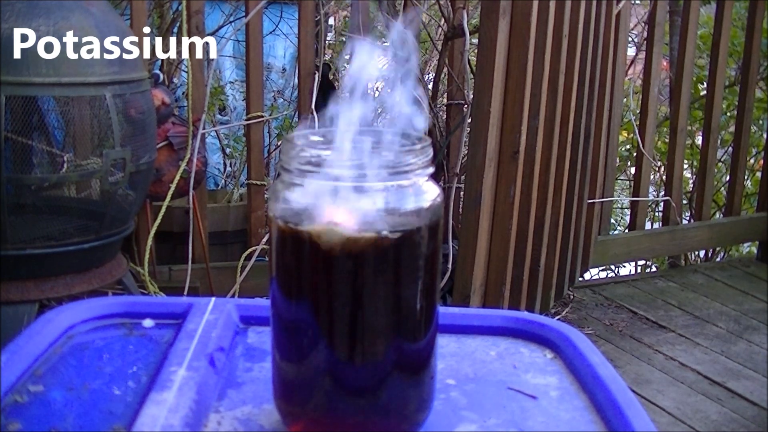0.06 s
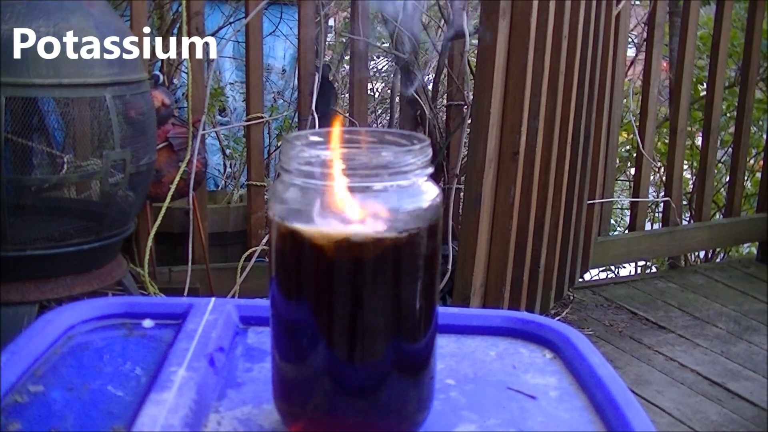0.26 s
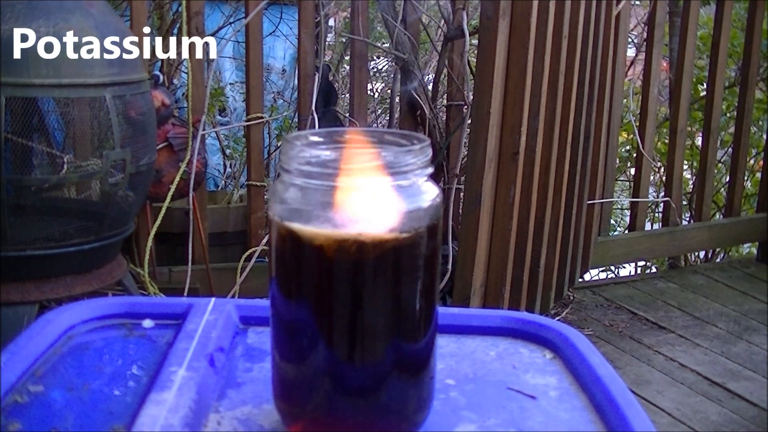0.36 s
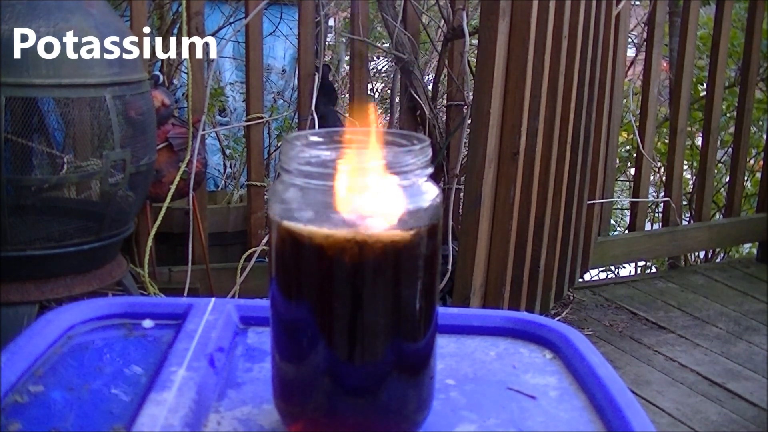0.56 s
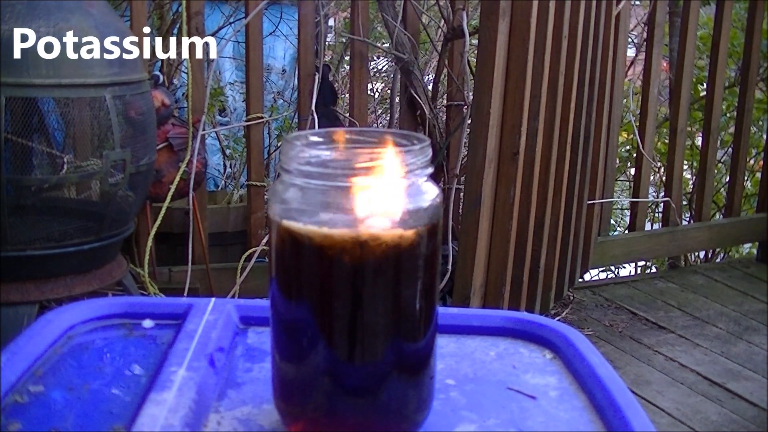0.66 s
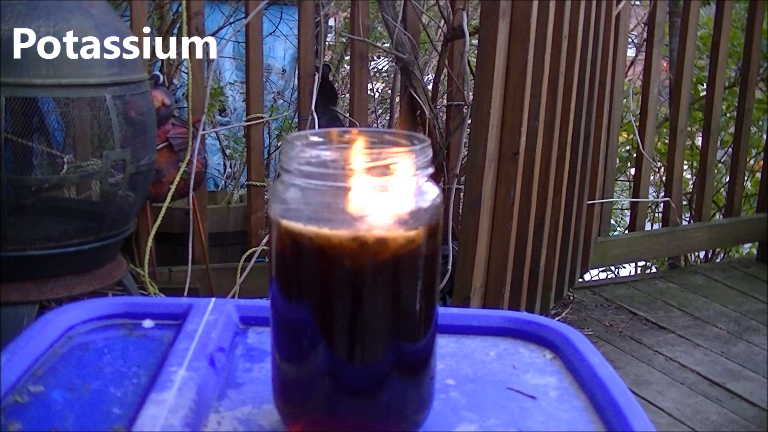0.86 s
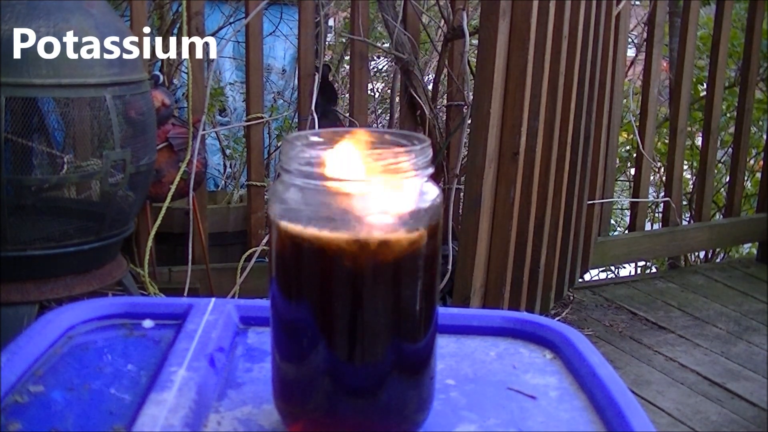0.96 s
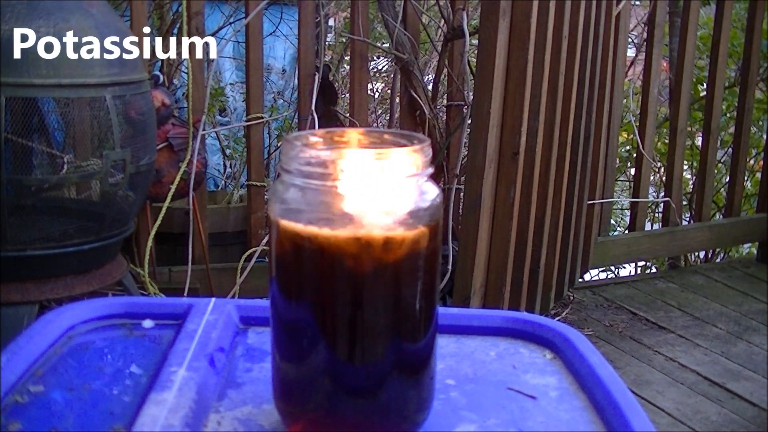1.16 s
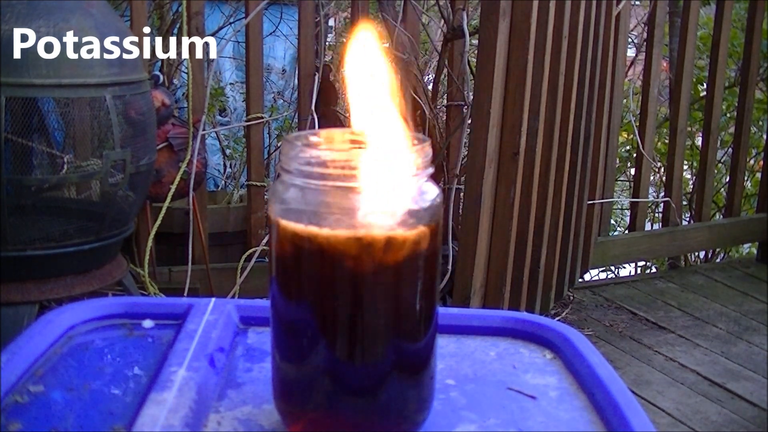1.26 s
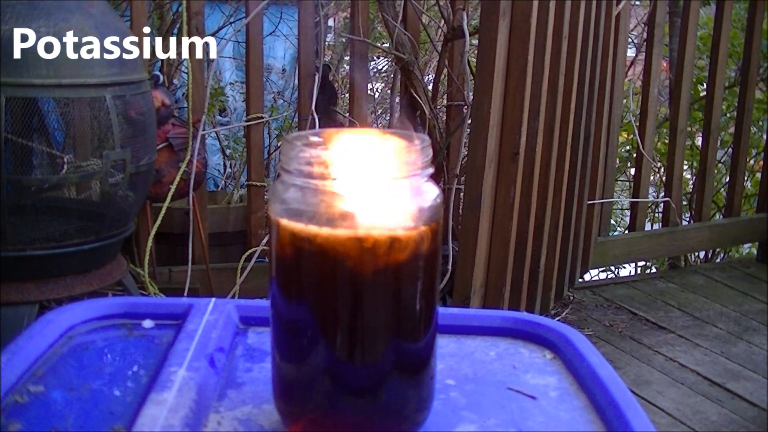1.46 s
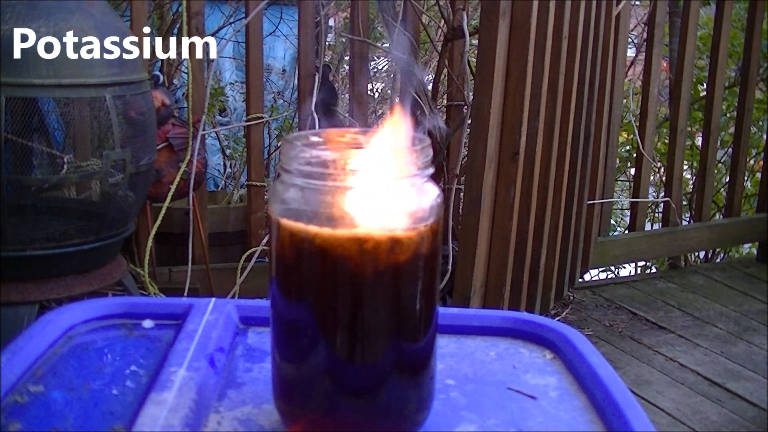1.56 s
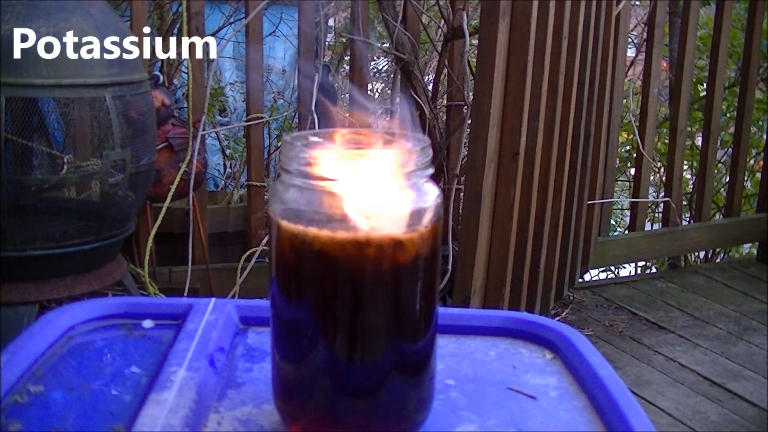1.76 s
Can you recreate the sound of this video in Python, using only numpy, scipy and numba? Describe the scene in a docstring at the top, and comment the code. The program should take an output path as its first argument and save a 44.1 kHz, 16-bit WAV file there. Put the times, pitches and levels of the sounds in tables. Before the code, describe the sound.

Metal fizzing and burning on liquid in a jar, with one sharp pop and crackles.

```python
"""Potassium burning in a jar

A lump of potassium skates on the liquid in an open glass jar on a wooden deck. Its hydrogen ignites
with one sharp pop that the fence throws back. It burns with a soft roar, fizzing, spitting and snapping.
The fizz rings the air in the jar, whose resonances (favourite pitches) glide as the lump moves about."""
import sys
import numpy as np
from scipy import signal
from scipy.fft import rfft, irfft
from scipy.io import wavfile
from numba import njit

SR = 44100
rng = np.random.default_rng(int(sys.argv[2]) if len(sys.argv) > 2 else 0)


def output_pcm(signal):
    """Save a mono or channel-first signal as 16-bit PCM at the path in sys.argv[1].

    Samples are clipped to [-1, 1] before scaling.
    """
    pcm = np.clip(np.atleast_2d(signal).T, -1, 1) * 32767
    wavfile.write(sys.argv[1], SR, np.round(pcm).astype(np.int16))


N = 79380

# tone of the sound scattered to the sides (frequency [Hz], level [dB])
SIDE_COLOUR = [(30, 31), (100, 9.5), (600, 21.5), (1300, 19), (2600, -54.5), (4500, -49), (8500, 26),
               (12000, 18.5), (15800, -22)]
# tone of the flame's roar (frequency [Hz], level [dB])
ROAR_COLOUR = [(20, 6), (40, -2.5), (65, -8), (90, -4.5), (130, -3), (210, 0.5), (310, -4.5), (450, -5),
               (700, -7), (950, -6.5), (1300, -10.5), (1700, -8), (2200, -9.5), (2600, -17), (3300, -28),
               (6000, -63)]
# loudness of the roar (time [s], level [dB])
ROAR_LEVEL = [(0, -36.5), (.13, -35.5), (.3, -35.5), (.45, -36), (.65, -35), (.77, -35.5), (.95, -36.5),
              (1.2, -36), (1.45, -35), (1.66, -34.5), (1.8, -37.5)]
# spits of molten metal (time [s], decay [s], splutter [dB], neck [dB], first resonance [dB], fizz [dB])
SPITS = [(0.119, 0.013, -35, -46, -52, -50), (0.23, 0.0017, -46, -31.5, -28, -53),
         (0.285, 0.0037, -40, -32, -32, -38), (0.311, 0.0072, -44, -32, -40, -33),
         (.358, 0.011, -42, -40, -32, -54), (0.389, 0.0021, -30, -31, -31, -42),
         (0.466, 0.0087, -33.5, -42, -37, -48), (0.741, 0.0029, -35, -33, -30.5, -51),
         (0.751, 0.0057, -33, -53, -53, -62), (0.831, 0.022, -41, -59, -52, -48),
         (1.072, 0.028, -46, -33, -36.5, -38), (1.334, 0.022, -46, -32, -38, -44.5),
         (1.553, 0.005, -32, -35, -42, -53), (1.634, .013, -28.5, -36, -48, -47),
         (1.73, .006, -34.5, -30.5, -54, -41), (1.747, 0.01, -33, -45, -33, -42)]
# tone of a spit's low splutter (frequency [Hz], level [dB])
SPLUTTER_COLOUR = [(40, -20), (150, -4), (400, -3), (700, 0), (1100, 1), (1600, -2), (2500, -15),
                   (6000, -30)]
# loudness of the broad fizz (time [s], level [dB])
FIZZ_LEVEL = [(0, -46), (.15, -40.5), (.22, -43), (.27, -45.5), (.42, -43.5), (.7, -47), (.9, -51.5),
              (1.03, -51.5), (1.1, -49), (1.28, -46.5), (1.38, -42.5), (1.57, -47), (1.66, -40.5),
              (1.74, -48.5), (1.8, -45)]
# tone of the broad fizz (frequency [Hz], level [dB])
FIZZ_COLOUR = [(1000, -15), (2400, -9.5), (3200, 8.5), (3700, 6), (5200, 8), (5700, -11), (6800, 1),
               (7700, 1), (9500, 2), (11000, 1), (12200, -10), (13500, -5), (15800, -11.5)]
# hollow note of the jar's neck (time [s], frequency [Hz], level [dB])
NECK_NOTE = [(0, 1900, -82), (.38, 2050, -46), (.6, 1850, -48), (1.0, 2000, -50), (1.1, 2090, -45),
             (1.22, 2040, -43), (1.4, 2134, -40), (1.6, 2110, -38.5), (1.8, 2110, -45.5)]
# gliding resonances of the air in the jar (time [s], first [Hz], second [Hz], third [Hz], fourth [Hz])
JAR_PITCHES = [(0, 3860, 5900, 7900, 11400), (.155, 3880, 5900, 7900, 10200),
               (.21, 4750, 6100, 7950, 10700), (.28, 4600, 6000, 7150, 11000),
               (.36, 4390, 6380, 8550, 10600), (.4, 4270, 6360, 8600, 10650),
               (.68, 4260, 6370, 8750, 10850), (.78, 4200, 6300, 8400, 10600),
               (.85, 4170, 6020, 8250, 11100), (.95, 4190, 6020, 8300, 11200),
               (1.07, 4620, 6900, 8700, 11800), (1.17, 4370, 6900, 8400, 11500),
               (1.3, 4720, 6900, 8950, 11400), (1.41, 4770, 6600, 8950, 10600),
               (1.55, 5130, 7300, 9250, 11150), (1.8, 5200, 7470, 9000, 11350)]
# loudness of the first resonance (time [s], level [dB])
FIRST_LEVEL = [(0, -45.5), (.09, -44.5), (.17, -42.5), (.22, -45), (.33, -49), (.37, -38), (.43, -40.5),
               (.72, -42.5), (.95, -47), (1.08, -43.5), (1.2, -44), (1.4, -44), (1.6, -43.5), (1.72, -41),
               (1.8, -44)]
# loudness of the three upper resonances (time [s], second [dB], third [dB], fourth [dB])
UPPER_LEVELS = [(0, -55.5, -62, -55.5), (.16, -52, -53, -62), (.22, -69, -46.5, -37.5),
                (.275, -63, -51, -81), (.31, -55, -61, -59), (.4, -51, -50, -55), (.68, -52, -49.5, -54.5),
                (.85, -58, -54, -55.5), (1.02, -63, -52, -55), (1.17, -64, -53, -50.5),
                (1.42, -55, -51.5, -68), (1.62, -73, -68, -53), (1.69, -54, -52, -56),
                (1.75, -40.5, -46, -59), (1.8, -53, -61, -55)]
# thin, high sizzle, strongest once the flame is tall (time [s], frequency [Hz], level [dB])
SIZZLE = [(0, 13000, -55), (.23, 13000, -58), (.29, 12500, -63), (.5, 12600, -57), (.75, 13000, -63),
          (1.0, 14000, -60), (1.15, 14000, -56), (1.27, 13400, -55), (1.38, 11800, -46.5),
          (1.5, 13000, -53), (1.62, 13400, -65), (1.73, 13500, -48), (1.8, 13600, -61)]
# narrow, steady jar notes that ring up as the fizz glides past them (frequency [Hz], gain [dB])
STEADY_NOTES = [(3170, 1), (3840, -25), (4290, -10), (4805, -5), (4985, -11.5), (5985, 6), (6353, -10),
                (7416, -7), (7795, 3), (8378, -5), (8900, -1), (9980, 3), (10450, -5)]
# single bubbles that burst with a snap (time [s], level [dB])
SNAPS = [(0.792, -33), (1.073, -26), (1.3423, -15), (1.347, -22), (1.6355, -22.5)]
# tone of a snap's sharp edge (frequency [Hz], level [dB])
SNAP_COLOUR = [(200, -7), (1000, -9), (2200, 4), (5000, -5), (8000, -8), (15000, -8)]
# notes of the jar's air, driven by the explosion (frequency [Hz], level [dB])
POP_NOTES = [(690, -14), (1260, -5), (1620, -13), (1920, -5), (2240, -15), (3200, -22.5), (3910, -20),
             (4400, -22), (4990, -22)]
# the fence's echo (time after the pop [s], level [dB])
ECHO_LEVEL = [(.003, -23), (.011, -23), (.014, -33), (.02, -26), (.027, -23), (.036, -27), (.045, -39),
              (.08, -58), (.2, -90)]
# tone of the echo (frequency [Hz], level [dB])
ECHO_COLOUR = [(100, -32), (900, -29), (1350, -8), (1800, 1), (2050, -13), (2500, -30.5), (4500, -33),
               (9000, -42)]

BURSTS_PER_S, BURST_SPREAD_DB, BURST_POWER_SHARE = 2500, 2.5, 0.51
ROAR_FLICKER_DB, FIZZ_FLICKER_DB = 1.17, 1.02
SPIT_RISE_S = 0.00095
NOTCH_RATIO, NOTCH_DEPTH = 0.786, 0.58
UPPER_WIDTHS_HZ = (270, 450, 520)
SNAP_DECAY_S, SNAP_EDGE_S, SNAP_FIRST_DB, SNAP_EDGE_DB = 0.00064, 0.00035, -9, -6
POP_START_S, POP_ATTACK_S, POP_HOLD_S, POP_RELEASE_S = .166, .0007, .0038, .0003
PUSH_AFTER_S, PUSH_WIDTH_S = .0022, .0005
CRACK_DB, THUMP_DB = -18, -6
SIDE_DB, BALANCE_DB = -24.5, 0.04
LOW_CUT_HZ, TOP_HZ, CEILING = 60, 15800, 1.27


def undb(db):
    """Turn decibels into a number to multiply by."""
    return 10 ** (np.asarray(db) / 20)


def unit(x):
    """Scale a signal to an average power of 1."""
    return x / np.sqrt(np.mean(x ** 2))


def curve(table, column=1, start=0):
    """Join the points in one column of a time table, giving a value for every sample."""
    rows = np.array(table, float)
    return np.interp(np.arange(N) / SR - start, rows[:, 0], rows[:, column])


def colour(x, points):
    """Shape the tone by (frequency [Hz], level [dB]) points; white noise keeps its power."""
    hz, db = np.array(points, float).T
    gain = undb(np.interp(np.log(np.fft.rfftfreq(N, 1 / SR) + 1), np.log(hz), db))
    return irfft(rfft(x) * unit(gain), N)


@njit
def gliding_band(x, hz, width_hz):
    """Let through the sound near a pitch that is given for every sample."""
    out, band, low = np.empty(len(x)), 0., 0.
    for i in range(len(x)):
        tuning = np.tan(np.pi * hz[i] / SR)
        damping = np.pi * width_hz / SR * (1 + tuning * tuning) / tuning
        swing = (band + tuning * (x[i] - low)) / (1 + tuning * (tuning + damping))
        band = 2 * swing - band
        low += 2 * tuning * swing
        out[i] = damping * swing
    return out


def band_pass(x, hz, width_hz):
    """Let through the sound near a steady or moving pitch."""
    return gliding_band(x, hz * np.ones(N), float(width_hz))


def resonate(x, hz, width_hz):
    """Ringing air: two band filters in a row, scaled so white noise keeps about the same power."""
    once = band_pass(x, hz, width_hz)
    return band_pass(once, hz, width_hz) * np.sqrt(2 * SR / (np.pi * width_hz))


def wander(per_s):
    """Drift at random, mostly between -1 and 1."""
    steps = rng.standard_normal(1024)
    return 1.1 * np.interp(np.arange(N) / SR * per_s, np.arange(len(steps)), steps)


def deck_scatter(jar):
    """The deck scatters a brief trace of the jar's sound to the sides."""
    age = np.arange(SR // 10) / SR
    tail = rng.standard_normal(len(age)) * np.exp(-age / 0.0091)
    scattered = signal.fftconvolve(jar, tail / np.linalg.norm(tail))[:N]
    return undb(SIDE_DB) * colour(scattered, SIDE_COLOUR)


def bubbles():
    """Countless tiny bursts of gas over a smooth jet of steam."""
    steam = rng.standard_normal(N)
    sizes = undb(BURST_SPREAD_DB * np.minimum(rng.exponential(size=N), 5))
    signs = rng.choice([-1, 1], N)
    bursts = unit(sizes * signs * (rng.random(N) < BURSTS_PER_S / SR))
    return np.sqrt(BURST_POWER_SHARE) * bursts + np.sqrt(1 - BURST_POWER_SHARE) * steam


def spitting(column):
    """Spits are puffs of gas that start fast and die away, at the levels in one column of SPITS."""
    t, power = np.arange(N) / SR, np.zeros(N)
    for spit in SPITS:
        start, decay_s = spit[:2]
        age = np.maximum(t - start, 0)
        rise = np.minimum(age / SPIT_RISE_S, 1)
        fall = np.exp(-np.maximum(age - SPIT_RISE_S, 0) / decay_s)
        power += (undb(spit[column]) * rise * fall) ** 2
    return np.sqrt(power) * rng.choice([-1, 1], N)


def flame():
    """The soft, fluttering roar of burning gas and the splutter of the liquid."""
    roar = bubbles() * undb(curve(ROAR_LEVEL) + ROAR_FLICKER_DB * wander(per_s=44.2))
    return colour(roar, ROAR_COLOUR) + colour(spitting(column=2), SPLUTTER_COLOUR)


def fizz():
    """Boiling round the metal, heard directly and through the jar's gliding and steady resonances."""
    flicker = undb(FIZZ_FLICKER_DB * wander(per_s=57))

    def gas(db):
        """Fresh bubbling that shares the one flicker."""
        return bubbles() * flicker * undb(db)

    first_hz, neck_hz = curve(JAR_PITCHES), curve(NECK_NOTE)
    out = colour(gas(curve(FIZZ_LEVEL)) + spitting(column=5), FIZZ_COLOUR)
    # sound bouncing off the wall partly cancels the fizz a little below the first resonance
    out -= NOTCH_DEPTH * band_pass(out, NOTCH_RATIO * first_hz, width_hz=1300)
    out += resonate(gas(curve(NECK_NOTE, column=2)) + spitting(column=3), neck_hz, width_hz=420)
    out += resonate(gas(curve(FIRST_LEVEL)) + spitting(column=4), first_hz, width_hz=400)
    # a softer, wider hiss follows the first resonance
    out += resonate(gas(curve(FIRST_LEVEL) - 8), 1.04 * first_hz, width_hz=900)
    out += resonate(gas(db=-55.5), hz=4920, width_hz=1100)  # a faint hiss that keeps its pitch
    for column, width_hz in enumerate(UPPER_WIDTHS_HZ, start=1):
        out += resonate(gas(curve(UPPER_LEVELS, column)), curve(JAR_PITCHES, column + 1), width_hz)
    out += resonate(gas(curve(SIZZLE, column=2)), curve(SIZZLE), width_hz=2900)
    return out + sum(undb(db) * band_pass(out, hz, width_hz=30) for hz, db in STEADY_NOTES)


def snaps():
    """Each bursting bubble gives a short crack that rings the neck and the first resonance."""
    t, out = np.arange(N) / SR, np.zeros(N)
    first_hz, neck_hz = curve(JAR_PITCHES), curve(NECK_NOTE)
    edge = colour(rng.choice([-1, 1], N), SNAP_COLOUR)
    for start, db in SNAPS:
        age = np.maximum(t - start, 0)
        ring = np.sin(2 * np.pi * neck_hz * age)
        ring += undb(SNAP_FIRST_DB) * np.sin(2 * np.pi * first_hz * age)
        crack = undb(SNAP_EDGE_DB) * edge * (age > 0) * np.exp(-age / SNAP_EDGE_S)
        out += undb(db) * (ring * np.exp(-age / SNAP_DECAY_S) + crack)
    return out


def fence_echo(age):
    """The fence throws the pop back as a short wash of noise; age is seconds since the pop."""
    loudness = (age > POP_HOLD_S) * undb(curve(ECHO_LEVEL, start=POP_START_S))
    return colour(rng.standard_normal(N) * loudness, ECHO_COLOUR)


def pop():
    """Hydrogen flashes through the jar: a few milliseconds of ring, crack and thump, then the echo."""
    age = np.maximum(np.arange(N) / SR - POP_START_S, 0)
    rise = np.minimum(age / POP_ATTACK_S, 1)
    burn = rise * np.exp(-np.maximum(age - POP_HOLD_S, 0) / POP_RELEASE_S)
    ring = sum(undb(db) * np.sin(2 * np.pi * hz * age) for hz, db in POP_NOTES)
    blast = rng.standard_normal(N) * burn
    crack = undb(CRACK_DB) * colour(blast, [(300, 12.5), (4500, -25), (7000, -9), (15000, -26)])
    # the expanding gas pushes once at the air in the neck
    push = np.exp(-((age - PUSH_AFTER_S) / PUSH_WIDTH_S) ** 2)
    thump = undb(THUMP_DB) * band_pass(push, hz=165, width_hz=230)
    return burn * ring + crack + thump + fence_echo(age)


def scene():
    """The jar stands straight ahead; scattered sound spreads it a little to the left and right."""
    jar = fizz() + flame() + snaps() + pop()
    side = deck_scatter(jar)
    return np.array([(jar + side) * undb(BALANCE_DB), jar - side])


def record(dry):
    """The microphone thins the deep bass and is overloaded by the pop; the highest treble is cut."""
    thin = signal.sosfilt(signal.butter(2, LOW_CUT_HZ, "high", fs=SR, output="sos"), dry)
    squashed = thin / (1 + (thin / CEILING) ** 6) ** (1 / 6)
    centred = signal.sosfilt(signal.butter(2, 35, "high", fs=SR, output="sos"), squashed)
    return signal.sosfilt(signal.ellip(10, .1, 80, TOP_HZ, fs=SR, output="sos"), centred)


dry = scene()
out = record(dry)
output_pcm(out)
```